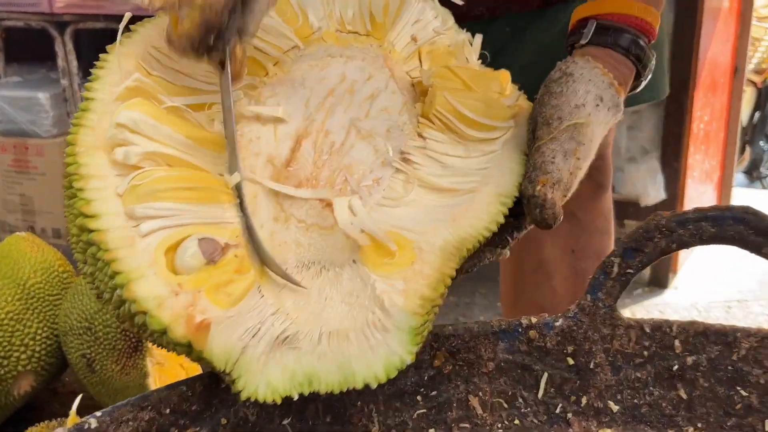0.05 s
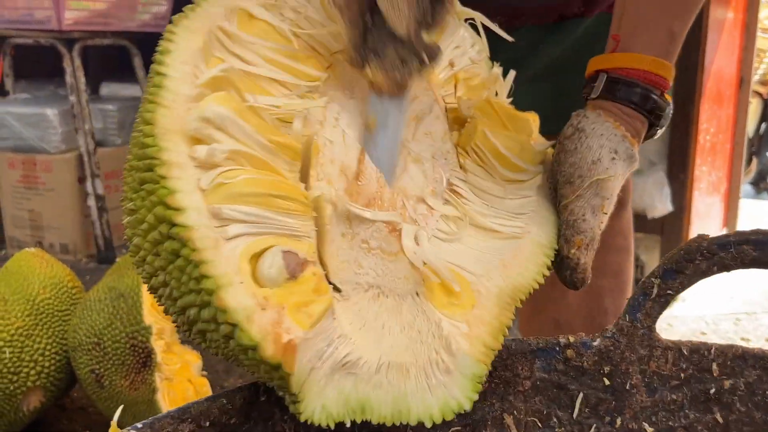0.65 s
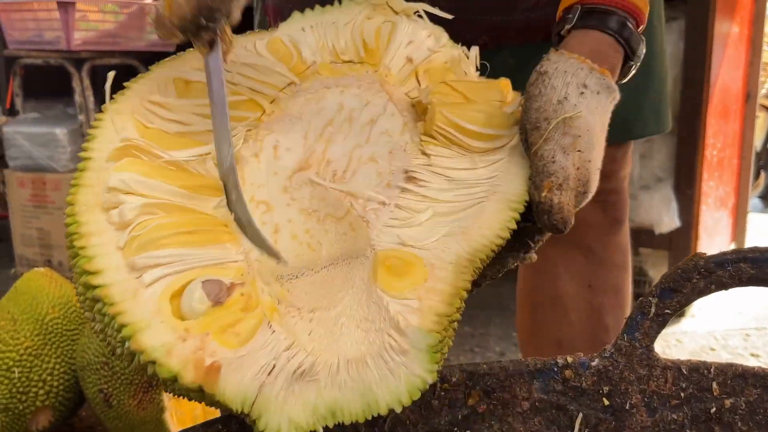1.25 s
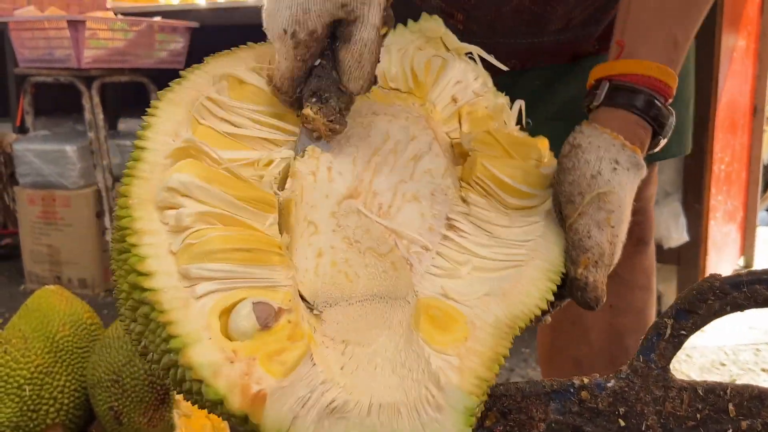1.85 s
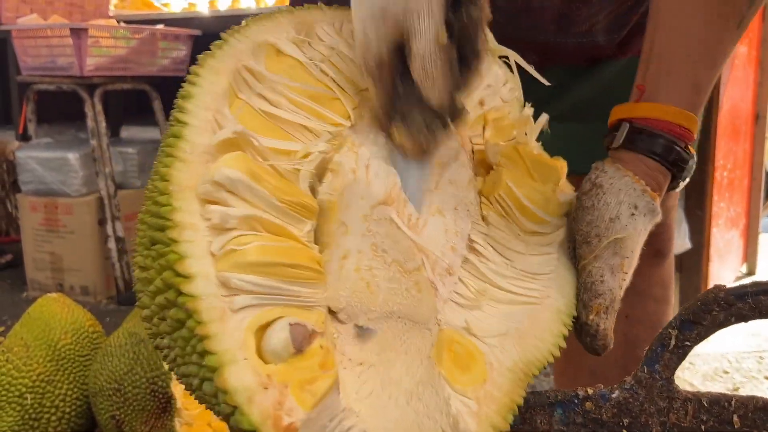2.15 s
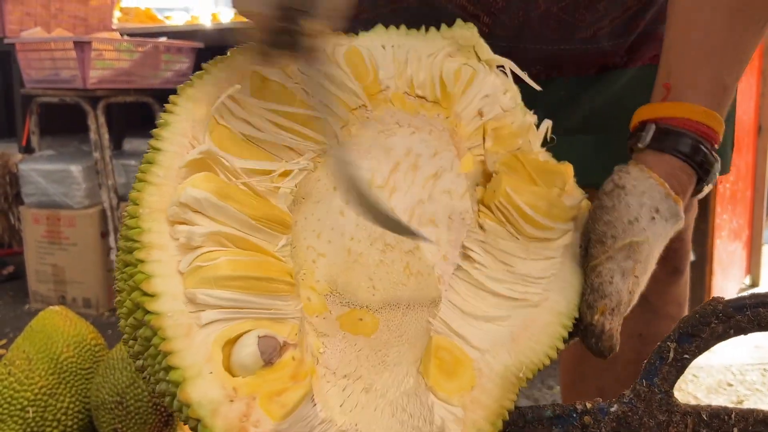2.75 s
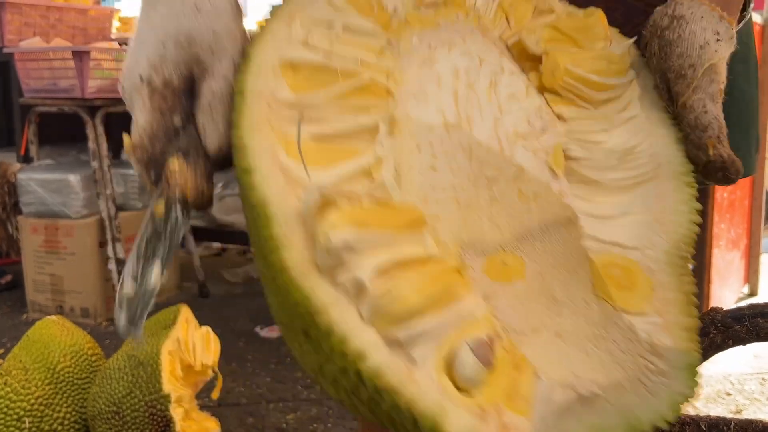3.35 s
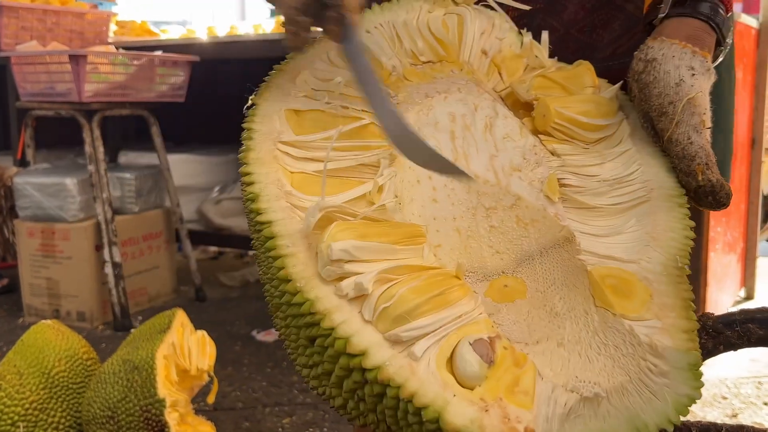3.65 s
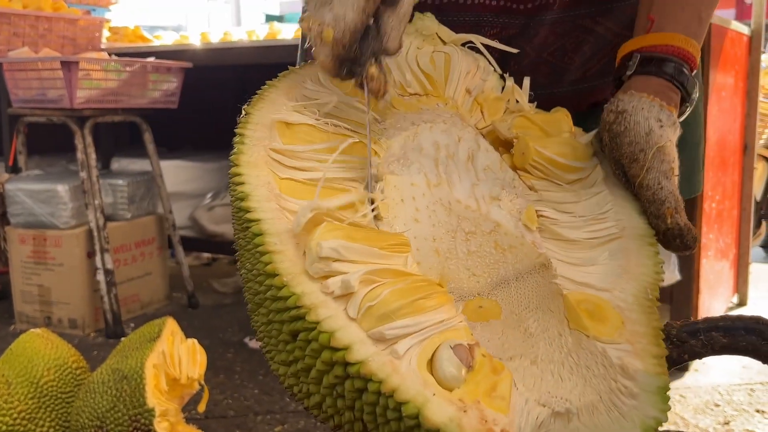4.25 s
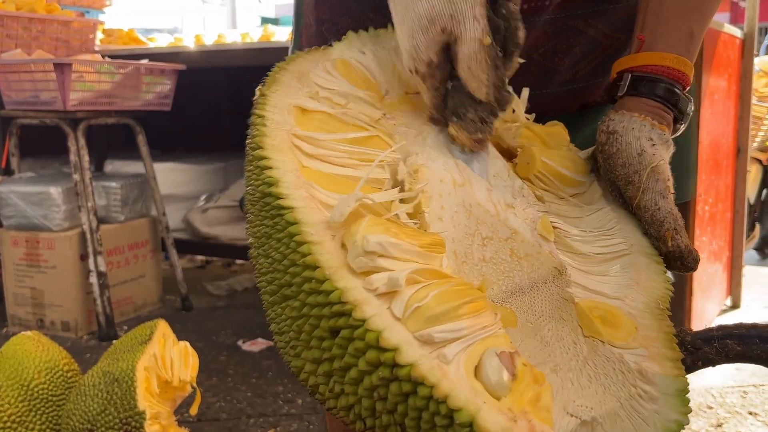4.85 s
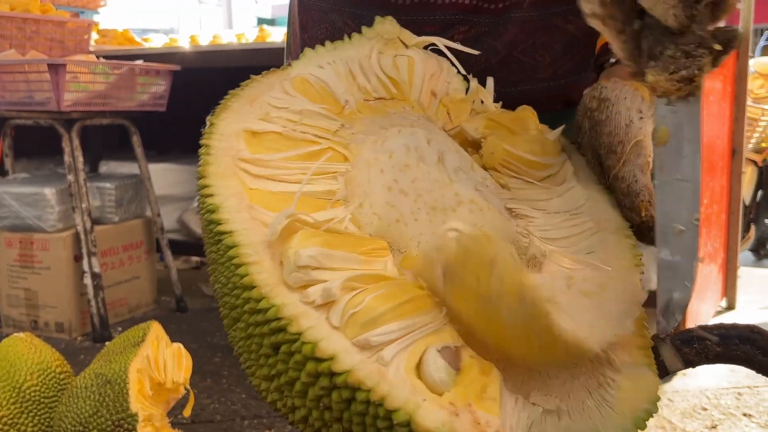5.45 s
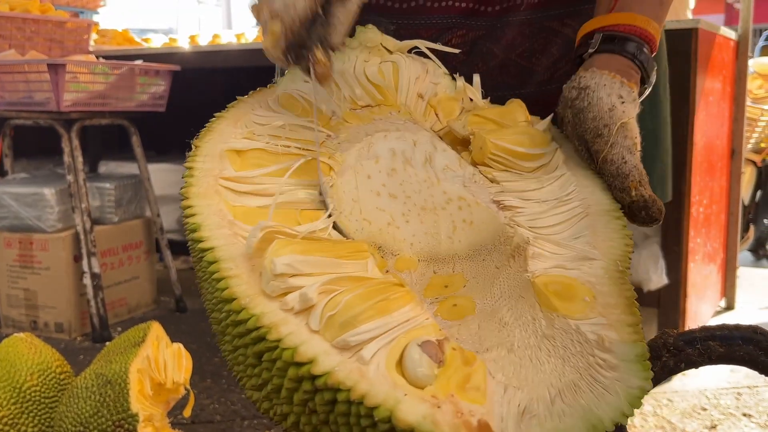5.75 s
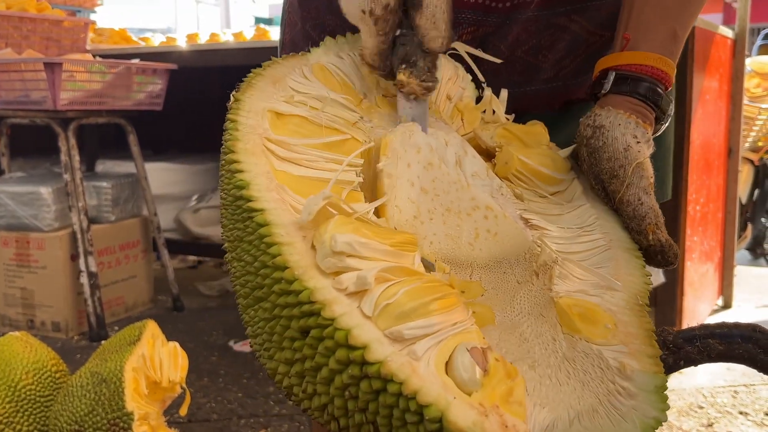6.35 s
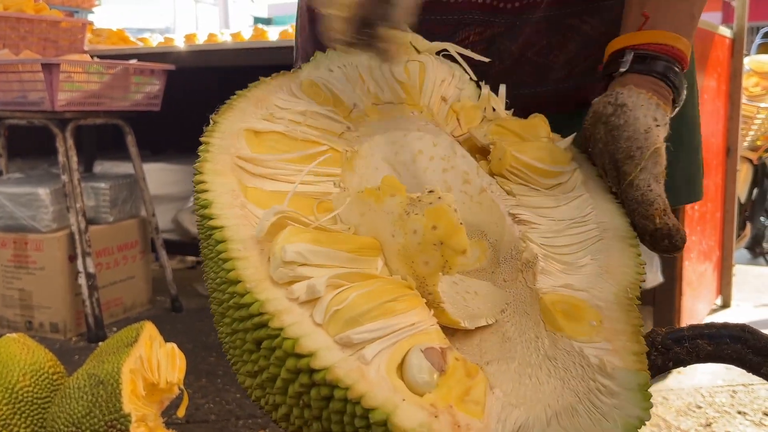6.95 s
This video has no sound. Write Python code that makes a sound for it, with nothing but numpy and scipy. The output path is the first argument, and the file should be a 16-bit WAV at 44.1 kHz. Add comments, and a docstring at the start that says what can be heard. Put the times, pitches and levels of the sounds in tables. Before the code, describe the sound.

A one-cylinder engine putters nearby, then speeds up with a deep, pulsing boom and a rattling casing, loudest past the middle and revving again at the end. All the while, close to the microphone, a knife tears through moist jackfruit fibres with quieter rasps, crunches, bright ticks and hollow cracks. Steady street traffic rumbles in the background, and a thin, faint whine comes in last.

```python
"""At a street stall, a jackfruit is carved while a one-cylinder engine idles nearby, then pulls away.
The knife saws through wet fibres in short hissing strokes; strands snap and the core cracks.
Each firing of the engine makes the exhaust thud, and the pipe booms as the speed rises.
Traffic washes along behind it all, and a thin high whine joins near the end."""
import sys
import numpy as np
from scipy import signal
from scipy.fft import rfft, irfft
from scipy.io import wavfile
from scipy.ndimage import uniform_filter1d

SR = 44100
rng = np.random.default_rng(int(sys.argv[2]) if len(sys.argv) > 2 else 0)


def store_wav(level_fs):
    """Save 16-bit WAV to argv[1]."""
    pcm = np.round(np.clip(np.atleast_2d(level_fs), -1, 1) * 32767)
    wavfile.write(sys.argv[1], SR, pcm.T.astype(np.int16))


N = 308700  # 7 seconds
TIME, HZ = np.arange(N) / SR, np.fft.rfftfreq(N, 1 / SR)

# Knife strokes; more rasp means a deeper cut: peak_s, swell_s, level_db, rasp_db, ring_hz
KNIFE_STROKES = [(.005, 0.013, -46.5, -13, 2630), (.2, 0.0295, -41.5, -1.5, 2320),
                 (.355, 0.031, -44.5, 4, 2650), (.532, 0.051, -47, 7.5, 2000), (.61, .025, -52, 8, 3000),
                 (.735, 0.0474, -47.5, 8, 2790), (0.87, 0.0424, -43.5, 8, 1780),
                 (1.25, 0.014, -48.5, 6.5, 2520), (1.32, 0.028, -45, -3.5, 2500),
                 (1.42, .06, -56, -14, 2500), (1.502, 0.016, -39, -2.5, 2970),
                 (1.665, 0.03, -42.5, 2.5, 1760), (1.855, 0.03, -44, -0.5, 2080),
                 (2.015, 0.03, -44.5, 3.5, 1780), (2.187, 0.039, -45.5, 4, 1920),
                 (2.401, 0.057, -44, 7.5, 1904), (2.452, 0.0644, -44.5, 7.5, 2630),
                 (2.835, .01, -51.5, 0.5, 3080), (2.864, 0.017, -51.5, 15.5, 3200),
                 (2.917, 0.017, -46.5, -9, 3070), (3.48, 0.13, -57.5, 9.5, 1750),
                 (4.13, 0.052, -50, -14, 3060), (4.159, 0.025, -45.5, 1.5, 5260),
                 (4.255, 0.038, -50.5, 2.5, 2480), (4.344, 0.0236, -47.5, 6, 2740),
                 (4.504, 0.0313, -46.5, 5, 2690), (4.697, 0.038, -51.5, 9.5, 1890),
                 (4.868, 0.07, -50.5, 7.5, 1920), (5.14, 0.12, -47, 6.5, 2056),
                 (5.298, 0.012, -48, 5.5, 2460), (5.661, 0.0037, -59, 16.5, 5000),
                 (5.806, 0.026, -40, -1.5, 3200), (5.88, 0.0186, -41, 3.5, 3300),
                 (5.97, 0.025, -50, 6, 3020), (6.062, 0.043, -55, 4, 2820),
                 (6.138, 0.022, -46.5, 8.5, 2900), (6.295, 0.026, -45, 4.5, 3050),
                 (6.359, 0.014, -55.5, 11, 2520), (6.428, 0.028, -45, 3.5, 3300),
                 (6.638, 0.049, -42, 1, 1750)]
# Tone colour (how strong each pitch is) of tearing fibres: pitch_hz, level_db
FIBRE_COLOUR = [(200, -20), (700, 7), (1100, -4), (1800, 0.5), (2400, -2.5), (3200, 0), (4500, -6),
                (7000, -6), (9000, -10), (12000, -11), (14300, -14.5), (15500, -23)]
# Strands snapping and the blade ticking: start_s, level_db
STRAND_TICKS = [(0.4524, -23), (0.748, -30), (0.829, -29), (1.2341, -27), (1.6317, -30), (2.1555, -26),
                (2.4544, -24), (2.8639, -32), (3.1073, -41), (3.7798, -36), (4.036, -40), (4.0555, -38),
                (4.1495, -22), (5.1791, -29), (5.2794, -36), (5.3774, -41), (5.656, -30), (5.665, -31),
                (5.7239, -31), (5.731, -32), (5.8531, -21), (6.0197, -36)]
# Bright colour of a tick: pitch_hz, level_db
TICK_COLOUR = [(500, -20), (2000, -8), (4500, -3.5), (7000, -4), (12000, -3), (15500, -9)]
# The core cracking as the blade levers it: start_s, level_db
CORE_CRACKS = [(0.517, -25.5), (0.877, -34), (2.0044, -27), (2.0472, -23.5), (2.383, -27), (2.401, -25),
               (2.413, -30), (2.863, -27.5), (4.6958, -25.5), (5.087, -23.5), (5.1425, -30), (6.2933, -30),
               (6.627, -20.5), (6.645, -26.5)]
# Hollow colour of the core: pitch_hz, level_db
CORE_COLOUR = [(300, -10), (580, 17.5), (800, -7), (1080, 13.5), (1400, 8.5), (1750, 12), (2000, -9),
               (2300, 8), (2800, -16), (3400, -6), (5000, -24), (10000, -39)]

# Engine speed, from idle through first gear to a fresh burst of throttle: time_s, firings_per_s
ENGINE_SPEED = [(0, 11.43), (1.25, 11.48), (1.5, 13.4), (1.8, 15.2), (2.25, 15.6), (2.5, 15.45),
                (2.7, 15.75), (3.0, 16.7), (3.3, 17.1), (4.4, 19.4), (4.7, 19.9), (5.0, 20.9), (5.7, 21.35),
                (6.1, 21.25), (6.35, 20.3), (6.55, 20.9), (6.85, 25.6), (7, 26)]
# Booms at 4 and 5 times the firing rate, swelling as they pass a low resonance: time_s, level_db
LOW_BOOM = [(0, -65), (1.6, -46), (1.75, -29), (2.1, -48), (2.9, -33), (3.3, -37.5), (3.6, -31.5),
            (3.9, -14.5), (4.15, -18), (4.5, -13), (4.8, -16.5), (5.0, -28), (5.3, -15.5), (5.85, -30.5),
            (6.1, -18), (6.25, -32), (6.38, -18.5), (6.54, -33), (6.68, -18.5), (7, -28.5)]
HIGH_BOOM = [(0, -30), (1.35, -24), (1.77, -15), (2.0, -17), (2.15, -16.5), (2.64, -24), (2.76, -13),
             (3.2, -12), (3.45, -12.5), (3.85, -15), (4.15, -24.5), (4.55, -26), (4.9, -22.5),
             (5.85, -23.5), (6.2, -36), (6.38, -21.5), (6.55, -31), (6.67, -18), (7, -29.5)]
# A brief tone at 8 times the firing rate as the engine takes the load: time_s, level_db
LOAD_TONE = [(0, -60), (1.9, -43), (2.3, -29.5), (2.65, -26.5), (2.92, -40), (3.07, -27.5), (3.4, -50),
             (7, -68)]
# Uneven firing, strongest as the clutch grips: time_s, depth_share
ENGINE_JUDDER = [(0, .2), (.9, .22), (1.3, .35), (1.55, .6), (1.9, 0.25), (2.4, 0.35), (2.7, 0.06),
                 (4.7, 0), (7, 0)]
# Colour of the exhaust thuds above the boom: pitch_hz, level_db
THUD_COLOUR = [(65, 9), (80, 10), (92, 5), (102, 1), (112, 3), (126, 5), (135, 1), (142, -3), (151, 1),
               (162, -7), (175, -10), (210, -8), (260, -14), (315, -20.5), (370, -15), (520, -21),
               (750, -21)]
# Strength of the thuds, highest under load: time_s, level_db
THUD_LEVEL = [(0, -39), (.6, -41.5), (1.35, -39.5), (2.55, -37.5), (2.85, -39.5), (3.1, -34), (3.35, -36),
              (3.7, -41), (5, -40.5), (5.7, -61), (6.6, -37), (7, -34.5)]
# Moments when the engine stumbles: time_s, dip_db
WEAK_FIRINGS = [(.315, -8), (1.405, -7), (1.85, -6), (2.1, -13), (2.235, -13), (2.36, -11), (2.67, -7),
                (2.92, -8), (3.905, -5), (6.485, -12)]
# Two resonances (pitches that ring easily) of the silencer: time_s, pitch_hz, level_db
SILENCER_LOW = [(0, 295, -55), (1.4, 290, -44), (1.8, 308, -33), (2.2, 312, -40.5), (2.8, 312, -40.5),
                (3.5, 292, -37.5), (4.3, 315.4, -33), (5.2, 337, -41), (7, 316, -33)]
SILENCER_HIGH = [(0, 450, -62), (1.4, 440, -58), (1.9, 467, -41.5), (2.601, 450, -41.5), (3.2, 445, -51),
                 (4.2, 462, -40.5), (4.6, 438, -50), (5.0, 422, -41), (5.5, 439, -32.5), (6.1, 432, -34.5),
                 (6.4, 444, -41.5), (7, 440, -36)]
# Colour of the rattling engine casing: pitch_hz, level_db
CASING_COLOUR = [(100, 3.5), (200, 3), (260, -5.5), (330, -2), (450, -4.5), (560, -3), (800, -16),
                 (1500, -34.5), (4000, -46.5)]

# Rise and fall of the traffic: time_s, roar_db, tyre_hiss_db
TRAFFIC_LEVELS = [(0, -43, -52.5), (1.5, -42, -52.5), (3.2, -43.5, -54), (4.5, -45, -52.5),
                  (5.1, -42.5, -52.5), (7, -42.5, -52.5)]
# Colour of the traffic: pitch_hz, level_db
TRAFFIC_COLOUR = [(15, -29), (30, -8), (43, 9), (70, 15), (120, 9.5), (220, -3), (480, -8.5), (800, -15),
                  (1700, -14.5), (2500, -22.5), (4000, -28), (6000, -35), (9000, -42), (15500, -50)]
# How alike left and right are: pitch_hz, likeness_share
STEREO_LIKENESS = [(100, 1), (300, .88), (600, .62), (1200, .2), (1600, .5), (2000, .85), (5000, .97),
                   (7000, .85), (8500, .97), (12000, .88)]
# How far the left wave runs ahead of the right: pitch_hz, lead_radians
LEFT_LEAD = [(250, 0), (1000, .5), (1500, 3.5), (1750, .4), (3000, .5), (5000, 0), (7000, -1.5),
             (8200, -3.0), (8800, -3.3), (11000, -5.8), (12800, -6.6), (15000, -9.2)]
# How much louder the left is than the right: pitch_hz, balance_db
LEFT_BALANCE = [(100, .5), (600, .7), (1000, .7), (1500, -5.3), (2000, -4.5), (3000, 0)]


def knife(rasp_db=-7.5, crunch_db=-3, ring_db=-1, ring_sag=.06, drag_db=-15, sticking_db=1.2):
    """Each stroke tears wet fibres with a hiss; deep ones add a rasp, a crunch and a sinking ring."""
    hiss_power, body_power, ring = np.zeros((3, N))
    for peak_s, swell_s, db, depth_db, ring_hz in KNIFE_STROKES:
        near = slice(*np.searchsorted(TIME, [peak_s - .5, peak_s + .5]))
        t = TIME[near] - peak_s
        fade_s = .014 + .22 * swell_s  # a long push stops faster than it builds
        push = np.exp(-abs(t / np.where(t < 0, swell_s, fade_s)) ** 2.2)
        drag = gain_of(drag_db) * np.exp(-(t / .1) ** 2)  # quiet rubbing before and after
        force = gain_of(db) * np.maximum(push, drag)
        hiss_power[near] += force ** 2
        body_power[near] += (force * gain_of(depth_db)) ** 2
        pitch_hz = ring_hz * (1 - ring_sag * np.tanh(t / swell_s))  # sinks as the blade goes in
        ring[near] += gain_of(db + depth_db) * push * np.cos(2 * np.pi * np.cumsum(pitch_hz) / SR)
    tearing = tearing_fibres()
    rasp = irfft(rfft(tearing) / (1 + (HZ / 6500) ** 4), N)  # the part below about 6500 Hz
    body = gain_of(rasp_db) * rasp + gain_of(crunch_db) * crunch()
    cut = np.sqrt(hiss_power) * (tearing - rasp) + np.sqrt(body_power) * body
    cut += gain_of(ring_db) * ring * wobble(240)
    return gain_of(sticking_db * wobble(62)) * cut


def tearing_fibres(fibres_per_s=5000, spread_db=1.5, smooth_noise=.22):
    """Thousands of fibres break each second, and their tiny clicks blur into a hiss."""
    sizes = gain_of(spread_db * np.minimum(rng.exponential(1, (2, N)), 5))
    clicks = sizes * rng.choice([-1, 1], (2, N)) * (rng.random((2, N)) < fibres_per_s / SR)
    hiss = unit_level(clicks) + smooth_noise * rng.standard_normal((2, N))
    tearing = shifting_cut(colour(hiss, FIBRE_COLOUR))
    return tearing / np.std(band(tearing, 9000, 15000))


def shifting_cut(sound, patchy_db=2.1):
    """The cut changes shape, so different pitches stand out from stroke to stroke."""
    grid = signal.stft(sound, nperseg=512)[2]  # the sound laid out by pitch and time
    patches = uniform_filter1d(rng.standard_normal(grid.shape[1:]), size=5, axis=0)
    patches = uniform_filter1d(patches, size=16, axis=1)
    return signal.istft(grid * gain_of(patchy_db * unit_level(patches)), nperseg=512)[1][:, :N]


def crunch(pops_per_s=900, low_hz=1700, high_hz=5200, spread_db=3, pitch_count=24):
    """Juicy cells burst under the blade: many small pops of random size and pitch."""
    sizes = gain_of(spread_db * np.minimum(rng.exponential(1, N), 3))
    hits = sizes * (rng.random(N) < pops_per_s / SR)
    choice = rng.integers(0, pitch_count, N)
    pops = [wet_pop(hz) for hz in np.geomspace(low_hz, high_hz, pitch_count)]
    return unit_level(sum(signal.oaconvolve(hits * (choice == k), pop)[:N] for k, pop in enumerate(pops)))


def wet_pop(pitch_hz, decay_cycles=6, rise_share=.086):
    """One cell bursts: a few dying vibrations that lift in pitch."""
    cycles = pitch_hz * TIME[:1000]
    age = cycles / decay_cycles
    return np.exp(-age) * np.sin(2 * np.pi * cycles * (1 + rise_share * np.tanh(age / 2)))


def snaps():
    """Thin strands snap brightly; the core gives way with a duller crack."""
    ticks = bursts(STRAND_TICKS, TICK_COLOUR, decay_s=.0018)
    cracks = bursts(CORE_CRACKS, CORE_COLOUR, decay_s=.014)
    return gain_of(-1) * ticks + gain_of(-4) * cracks


def blade_squeak(peak_s=2.615, half_length_s=.05, pitch_hz=4100, fall_hz_per_s=1500, level_db=-57):
    """A thin, scraping squeak falls slightly as the blade comes free."""
    t = TIME - peak_s
    falling_hz = pitch_hz - fall_hz_per_s * np.clip(t, -half_length_s, half_length_s)
    swell = np.exp(-(t / half_length_s) ** 4)
    return gain_of(level_db) * swell * fuzzy_tone(np.cumsum(falling_hz) / SR, width_hz=130)


def engine():
    """Exhaust, silencer and casing all keep time with the one firing cylinder."""
    rate_hz, = follow(ENGINE_SPEED)
    firings = .1 + np.cumsum(rate_hz) / SR  # goes up by one with each firing
    stumble_db = sum(db * np.exp(-((TIME - s) / .022) ** 2) for s, db in WEAK_FIRINGS)
    pipe = gain_of(stumble_db) * exhaust(firings, rate_hz)
    return pipe + silencer(firings, rate_hz) + casing(firings, rate_hz)


def exhaust(firings, rate_hz, drift_radians=.096, unevenness=.22):
    """Puffs of gas make harmonics (multiples of the firing rate): low ones boom, higher ones thud."""
    boom = sum(gain_of(follow(levels)[0]) * np.cos(2 * np.pi * harmonic * firings)
               for harmonic, levels in ((4, LOW_BOOM), (5, HIGH_BOOM), (8, LOAD_TONE)))
    # strong and weak firings take turns, never quite regularly
    boom *= 1 + np.sqrt(2) * follow(ENGINE_JUDDER)[0] * np.cos(np.pi * firings + 1.93 * wobble(2.76))
    thuds = np.zeros(N)
    for harmonic in range(6, 30):
        size = gain_of(at_pitch(THUD_COLOUR, harmonic * rate_hz))
        lag = .2 * (harmonic - 6) ** 2  # the silencer smears each thud in time
        drift = drift_radians * (harmonic - 5) * wobble(1)  # shifting echoes stir high harmonics most
        thuds += size * np.cos(2 * np.pi * harmonic * firings - lag + drift)
    thuds *= gain_of(follow(THUD_LEVEL)[0]) * (1 + unevenness * wobble(23))
    return np.sqrt(2) * (boom + thuds)


def silencer(firings, rate_hz, width_hz=20, drift_radians=.95, flutter=.4):
    """High harmonics drone in turn as rising speed carries them through the silencer's resonances."""
    drones = np.zeros((2, N))
    for resonance in (SILENCER_LOW, SILENCER_HIGH):
        centre_hz, db = follow(resonance)
        nearest = np.round(centre_hz / rate_hz)
        tone = np.zeros(N, complex)
        drifts = [drift_radians * wobble(9) for _ in range(5)]
        for harmonic in range(int(nearest.min()) - 2, int(nearest.max()) + 3):
            closeness = np.exp(-((harmonic * rate_hz - centre_hz) / width_hz) ** 2)
            phase = 2 * np.pi * harmonic * firings + harmonic ** 2 + drifts[harmonic % 5]
            tone += closeness * np.exp(1j * phase)
        sides = [(tone * (1 + flutter * (wobble(13) + 1j * wobble(13)))).real for side in "LR"]
        drones += gain_of(db) * unit_level(np.array(sides))
    return drones


def casing(firings, rate_hz, idle_hz=11.4, idle_db=-47, driving_db=-37, db_per_hz=.5, throb=.14):
    """The casing rattles, hardest just after each firing, and grows louder with speed."""
    beat = 1 + throb * np.cos(2 * np.pi * (firings - .1))
    above_idle_hz = rate_hz - idle_hz
    db = driving_db + (idle_db - driving_db) * np.exp(-above_idle_hz / 1.1) + db_per_hz * above_idle_hz
    return gain_of(db) * unit_level(noise(CASING_COLOUR) * beat)


def traffic(rumble_db=-25, roar_boost_db=2, hiss_boost_db=-2, flicker_db=.6):
    """Traffic farther off: a steady rumble, with a roar and tyre hiss that swell slowly."""
    roar_db, hiss_db = follow(TRAFFIC_LEVELS)
    wash = noise(TRAFFIC_COLOUR)
    rumble = gain_of(rumble_db) * unit_level(band(wash, 0, 200))
    roar = gain_of(roar_db + roar_boost_db) * band(wash, 200, 3000) / np.std(band(wash, 700, 1600))
    hiss = gain_of(hiss_db + hiss_boost_db) * band(wash, 3000, SR / 2) / np.std(band(wash, 4000, 7000))
    return rumble + (roar + hiss) * gain_of(flicker_db * wobble(21))


def whine(start_s=6.18, fade_in_s=.12, pitch_hz=9620, level_db=-62):
    """A faint, fuzzy high whine fades in and holds."""
    fade = np.clip((TIME - start_s) / fade_in_s, 0, 1)
    return gain_of(level_db) * fade * fuzzy_tone(pitch_hz * TIME, width_hz=150)


def gain_of(db):
    """Turns decibels into a number to multiply by."""
    return 10 ** (np.asarray(db) / 20)


def unit_level(sound):
    """Scales a sound to an average (rms) level of 1."""
    return sound / np.sqrt(np.mean(sound ** 2) + 1e-20)


def at_pitch(table, hz):
    """Looks up a table by pitch, sliding between its rows."""
    pitches, values = np.transpose(table)
    return np.interp(np.log(hz + 1), np.log(pitches + 1), values)


def follow(table):
    """Joins a table's rows into curves over time, one per value column."""
    times, *columns = np.transpose(table)
    return [np.interp(TIME, times, column) for column in columns]


def wobble(rate_hz):
    """A random curve that moves up to about rate_hz times a second."""
    return unit_level(irfft(rfft(rng.standard_normal(N)) * np.exp(-(HZ / rate_hz) ** 2), N))


def fuzzy_tone(cycles, width_hz):
    """A tone blurred into a narrow band of noise."""
    fuzz = wobble(width_hz) + 1j * wobble(width_hz)
    return unit_level((fuzz * np.exp(2j * np.pi * cycles)).real)


def colour(pair, tone_colour):
    """Blends two unrelated noises into a partly alike left and right, then colours them."""
    left, other = rfft(pair)
    likeness = np.clip(at_pitch(STEREO_LIKENESS, HZ), 0, 1)
    right = likeness * left + np.sqrt(1 - likeness ** 2) * other
    return irfft(np.array([left, right]) * gain_of(at_pitch(tone_colour, HZ)), N)


def noise(tone_colour):
    """Steady stereo noise of a given colour."""
    return colour(rng.standard_normal((2, N)), tone_colour)


def band(sound, low_hz, high_hz):
    """Keeps the part between two pitches."""
    return irfft(rfft(sound) * ((HZ > low_hz) & (HZ < high_hz)), N)


def bursts(events, tone_colour, decay_s):
    """Bursts of noise that start sharply and die away."""
    strength = sum(gain_of(db) * (TIME >= s) * np.exp(-abs(TIME - s) / decay_s) for s, db in events)
    return strength * unit_level(noise(tone_colour))


def scene():
    """The engine, the street and the carving, heard together."""
    return engine() + traffic() + knife() + snaps() + blade_squeak() + whine()


def record(dry, top_hz=15700):
    """Left and right hear each pitch with their own timing and level; the highest treble is cut."""
    half_shift = np.exp(.5j * at_pitch(LEFT_LEAD, HZ)) * gain_of(at_pitch(LEFT_BALANCE, HZ) / 2)
    sides = irfft(rfft(dry) * np.array([half_shift, 1 / half_shift]), N)
    treble_cut = signal.firwin(511, top_hz, window=("kaiser", 9), fs=SR)
    return signal.oaconvolve(sides, treble_cut[None], "same")


dry = scene()
out = record(dry)
store_wav(out)
```